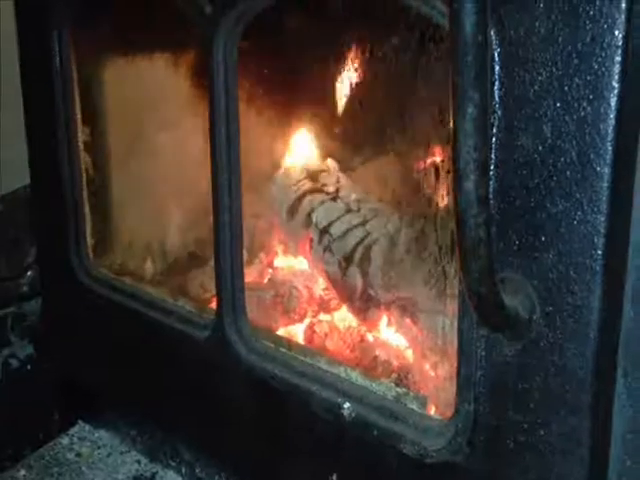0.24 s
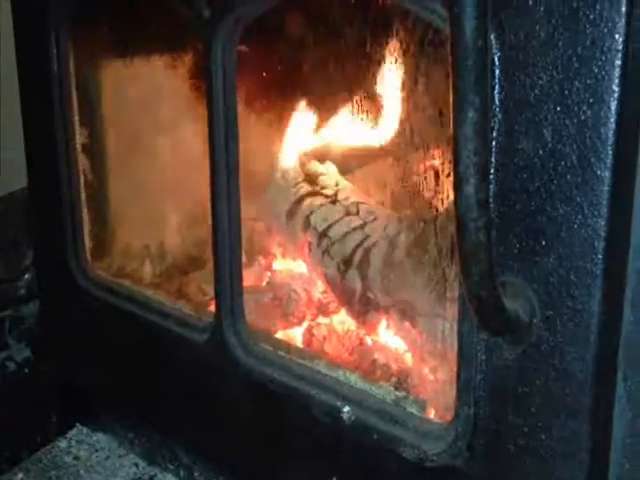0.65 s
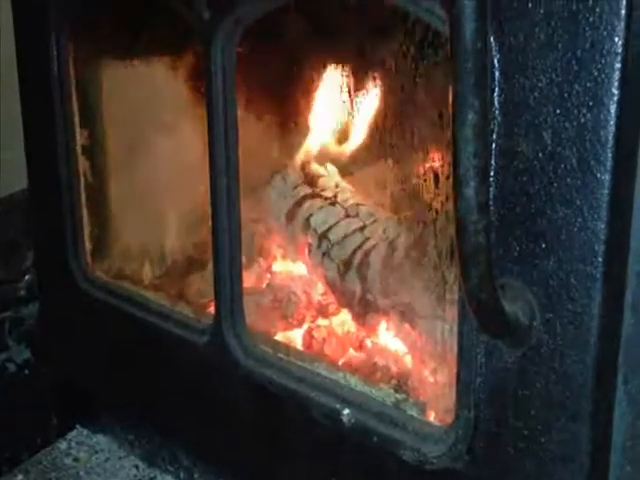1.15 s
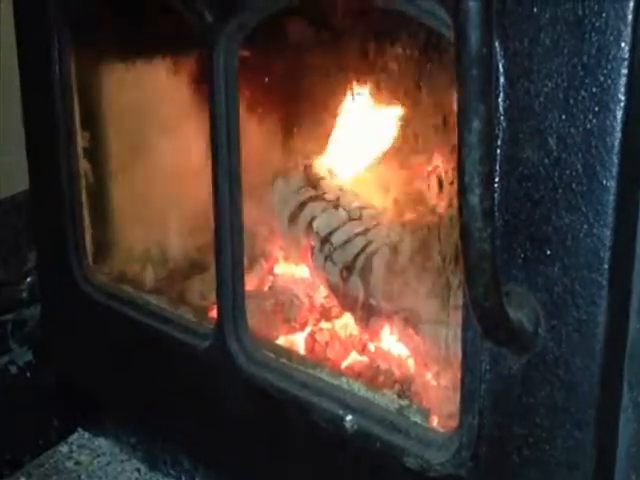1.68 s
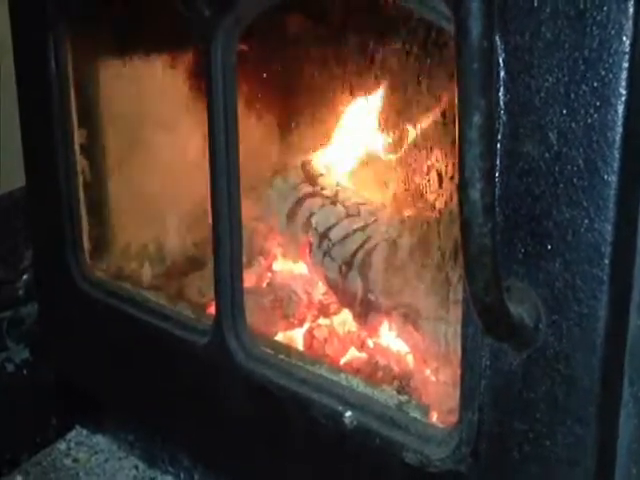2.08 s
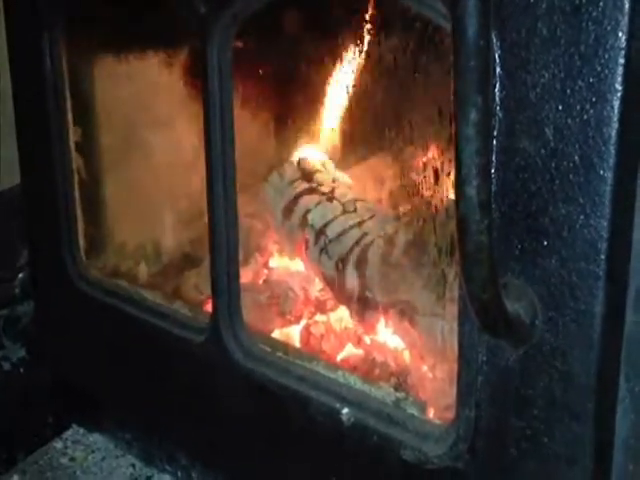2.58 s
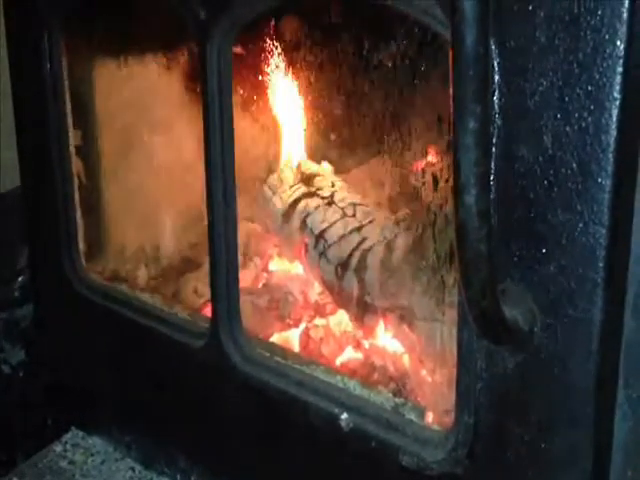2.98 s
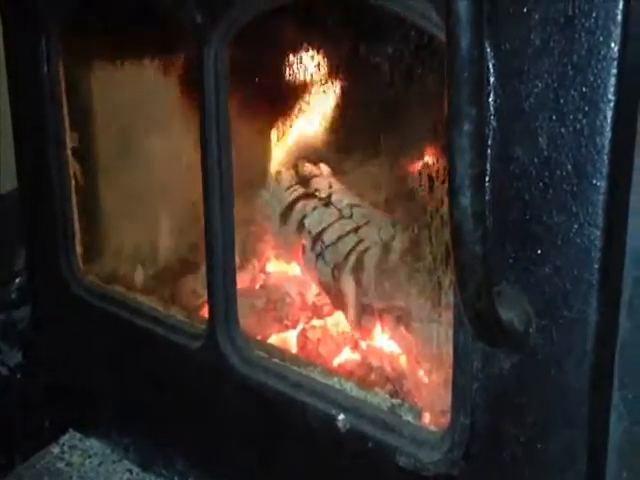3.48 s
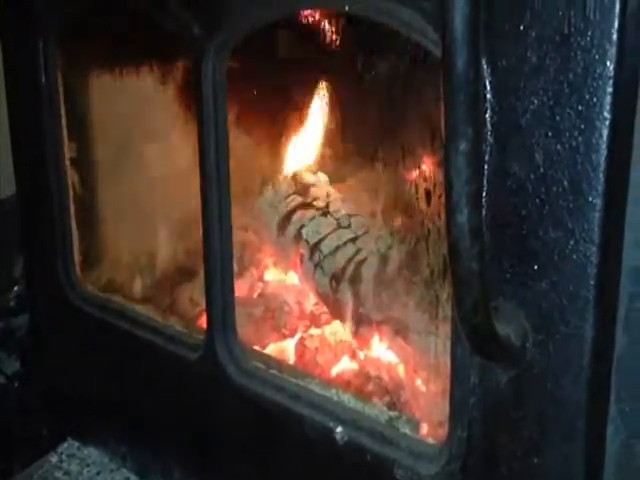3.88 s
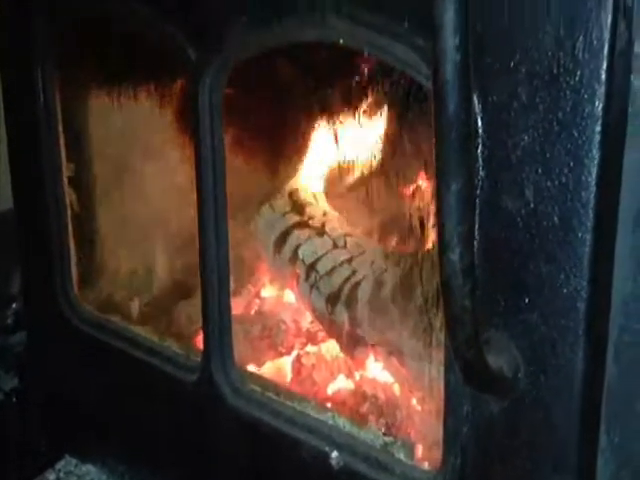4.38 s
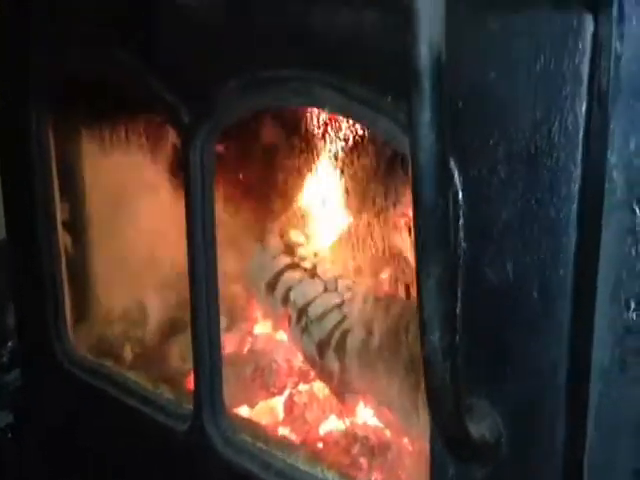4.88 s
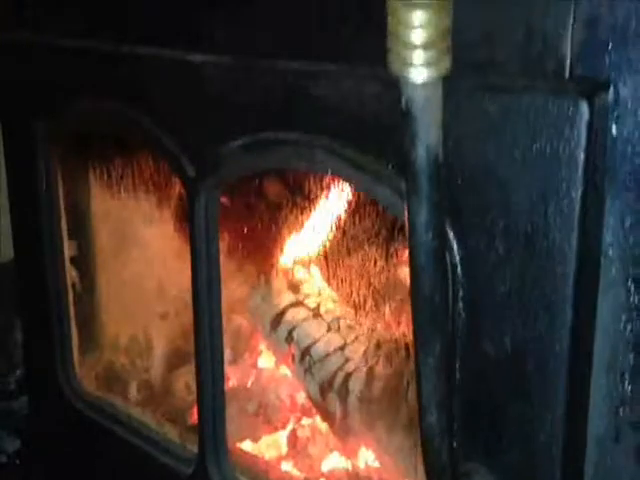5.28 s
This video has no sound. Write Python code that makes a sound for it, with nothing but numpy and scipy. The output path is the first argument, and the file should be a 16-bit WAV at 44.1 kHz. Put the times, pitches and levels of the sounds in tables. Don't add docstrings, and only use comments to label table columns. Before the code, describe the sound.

The first 0.15 s is silent, then quiet room air and a steady low hum near 120 Hz appear at once. From 0.2 s a small heat engine ticks on an iron stove: a crank knock every 0.47 s or so, with a rod click between, from about 0.5 s, making roughly four even ticks a second until the end near 5.5 s. Each tick is a tight burst of hard metal bounces lasting some 20-30 ms, crisp and rattly above 6 kHz, with a short dull plate and frame ring and a small room tail. Knocks have a stronger frame ring; clicks are slightly lighter. A faint rising squeak around 2.6 kHz trails the knocks, with an almost hidden tap afterwards. Throughout, soft low-weighted air noise and flue tones near 410 and 460 Hz continue, while a weak whistle near 560 Hz drifts in and out, longest around 4-5 s.

```python
import sys
import numpy as np
from scipy import signal
from scipy.fft import rfft, irfft, next_fast_len
from scipy.io import wavfile
from scipy.ndimage import uniform_filter1d

SR = 44100
rng = np.random.default_rng(int(sys.argv[2]) if len(sys.argv) > 2 else 0)


def field_ratio(decibels):
    return 10 ** (np.asarray(decibels, dtype=float) / 20)


def bounce(signal):
    frames = np.transpose(np.atleast_2d(signal))
    limited = np.clip(frames, -1, 1)
    pcm = np.round(limited * 32767).astype(np.int16)
    wavfile.write(sys.argv[1], SR, pcm)


N = 244443

# [dB, frame ring]
CRANK_KNOCKS = [(0.196, -50, -42, -41.5), (0.6728, -49, -41.5, -39.5), (1.148, -49.5, -46, -40),
                (1.6212, -53, -43.5, -40.5), (2.0925, -49.5, -44, -38.5), (2.5622, -50, -43.5, -41.5),
                (3.0315, -49.5, -40.5, -39), (3.4994, -50, -40.5, -39), (3.9674, -48.5, -44, -37.5),
                (4.4332, -50, -42, -39.5), (4.8969, -48, -39.5, -39), (5.3374, -48, -40, -38.5)]
# [dB, frame ring]
ROD_CLICKS = [(0.4981, -49, -44.5, -44.5), (0.9762, -52, -41, -46), (1.4502, -51.5, -40.5, -45.5),
              (1.9233, -53.5, -44.5, -44), (2.3913, -50, -47, -43), (2.8642, -50, -41.5, -43),
              (3.3309, -50, -40, -42.5), (3.7983, -53, -39.5, -41), (4.2647, -51, -42, -44),
              (4.7294, -48.5, -42.5, -41), (5.1926, -48.5, -36, -42)]
# first_db [dB], second_db [dB]
PIN_SLIPS = [(-52, -72), (-61, -66), (-50, -64), (-58, -69), (-55, -64), (-58, -73), (-58, -71), (-62, -67),
             (-51, -57), (-52, -57), (-59, -56), (-53, -48)]
# delay_s [s], treble_db [dB], low_db [dB]
KNOCK_CONTACTS = [
    (-.004, -7, -22),
    (0, 0, 0),
    (.0012, -4, -3),
    (.0045, -2, -10),
    (.0095, -1, -2),
    (.0165, -5, -8),
]
# delay_s [s], treble_db [dB], low_db [dB]
CLICK_CONTACTS = [
    (0, 0, 0),
    (.0015, -6, -5),
    (.006, -6, -10),
    (.0105, -2, -3),
    (.015, -3, -7),
    (.026, -9, -8),
]
# pitch_hz [Hz], level_db [dB], t60_s [s]
STOVE_PLATE = [(560, -8, .02), (625, 0, .045), (670, -4, .025), (750, -4, .02), (845, -5, .025),
               (1000, -9, .015)]
# pitch_hz [Hz], level_db [dB], t60_s [s]
KNOCK_FRAME = [(1227, -4, .015), (1480, -7, .012), (1722, -1, .02), (1870, -4, .02), (2100, -6, .015),
               (2540, 1, .02), (2850, -9, .015), (3423, -18, .015), (4435, -24, .03)]
# pitch_hz [Hz], level_db [dB], t60_s [s]
CLICK_FRAME = [(1200, -7, .015), (1722, -1, .02), (2110, -6, .015), (2648, 0, .025), (2900, -4, .015),
               (3251, -8, .012), (3552, -14, .03), (3940, -18, .015)]
# pitch_hz [Hz], level_db [dB], t60_s [s]
CRANK_THIN_PARTS = [(5800, -8, .01), (6158, -6, .012), (6503, -5, .012), (7428, -9, .012), (8333, -7, .012),
                    (9065, -7, .035), (9280, -10, .03), (9689, -10, .03), (10465, -9, .012),
                    (10938, -5, .015), (11304, -1, .02), (11670, -3, .015), (12553, -6, .012),
                    (12812, -4, .03), (13221, -6, .012), (13544, -6, .015), (14104, -4, .025)]
# pitch_hz [Hz], level_db [dB], t60_s [s]
ROD_THIN_PARTS = [(5900, -8, .01), (6223, -4, .012), (6610, -3, .012), (7428, -5, .012), (7795, -2, .014),
                  (8074, -3, .012), (8527, -7, .012), (9453, -7, .012), (10292, -8, .012),
                  (10852, -5, .012), (11326, -4, .012), (11606, -5, .012), (12726, -3, .012),
                  (13221, -3, .012), (13652, -4, .012), (14039, -2, .012), (14400, 0, .015)]
# start_s [s], length_s [s], level_db [dB]
WHISTLE_SPELLS = [(0.174, 0.47, -60), (0.955, .15, -59), (1.44, 0.11, -55), (1.67, 0.34, -56),
                  (2.305, 0.056, -54), (2.683, .35, -59), (3.182, 0.23, -63), (3.806, 0.071, -54),
                  (3.96, 0.99, -60), (4.18, 0.077, -54), (5.17, 0.33, -61)]
# pitch_hz [Hz], width_hz [Hz], level_db [dB rms]
DRAUGHT = [
    (412.2, 7.8, -61.5),
    (462.7, 12, -61),
    (850, 50, -65),
]
# pitch_hz [Hz], level_db [dB rms]
HUM = [
    (59.9, -66),
    (119.9, -48.5),
    (221.3, -66),
]
# pitch_hz [Hz], density_db [dB per Hz]
AIR_COLOUR = [(25, -18), (50, -5), (88, 0.5), (150, -3), (300, -6), (450, -2), (1000, -8), (1800, -11.5),
              (2900, -18), (3800, -25.5), (6200, -28), (7500, -33.5), (14500, -33.5), (16000, -40)]
# time_s [s], level_db [dB]
AIR_LEVEL = [(0.4, -48.5), (.9, -47.5), (1.6, -49), (2.5, -50), (3.3, -47.5), (4.5, -48.5), (5.1, -47.5),
             (5.4, -48)]

LEAD_S = .01
TICK_SAMPLES = 8000


def engine():
    slack_delay_s, slack_db = .195, -68
    track = np.zeros(N)
    for (s, *levels_db), slips_db in zip(CRANK_KNOCKS, PIN_SLIPS):
        knock = tick(KNOCK_CONTACTS, KNOCK_FRAME, CRANK_THIN_PARTS, levels_db, rattle_db=-6.5, rattle_s=.021)
        add(track, s, room(knock) + squeak(slips_db))
        slack = tick([(0, 0, 0)], CLICK_FRAME, ROD_THIN_PARTS, [slack_db] * 3, rattle_db=-9, rattle_s=.005)
        add(track, s + slack_delay_s, slack)
    for s, *levels_db in ROD_CLICKS:
        click = tick(CLICK_CONTACTS, CLICK_FRAME, ROD_THIN_PARTS, levels_db, rattle_db=-8, rattle_s=.017)
        add(track, s, room(click))
    return track


def tick(contacts, frame, thin_parts, levels_db, rattle_db, rattle_s):
    treble_db, thud_db, frame_db = levels_db
    high, low = blows(contacts, rattle_db, rattle_s)
    crack_band = signal.butter(5, [5700, 14900], "band", fs=SR, output="sos")
    snap_band = signal.butter(3, [550, 3000], "band", fs=SR, output="sos")
    crack = signal.sosfilt(crack_band, high - .27 * np.roll(high, 1))
    snap = signal.sosfilt(snap_band, low)
    damped_parts = [(hz, db, .85 * t60) for hz, db, t60 in thin_parts]
    sound = body(high, damped_parts, treble_db - 1.5, scatter_db=1.5)
    sound += field_ratio(treble_db + 5) * crack + field_ratio(frame_db + 19.5) * snap
    sound += body(low, STOVE_PLATE, thud_db, scatter_db=.8)
    sound += body(low, frame, frame_db - 1.5, scatter_db=1.2)
    return sound


def blows(contacts, rattle_db, rattle_s):
    scrape_s, jitter_s, size_scatter_db = .0015, .0003, 1.5
    t = tick_time()
    rattle = np.where(t > 0, np.exp(-(np.abs(t) / rattle_s) ** 4), 0) * field_ratio(rattle_db)
    high = rattle * rng.standard_normal(len(t))
    low = rattle * field_ratio(-19.5) * rng.standard_normal(len(t))
    grit = rng.standard_normal(len(t))
    for delay, high_db, low_db in contacts:
        late, size = rng.standard_normal(2)
        start = delay + jitter_s * late * (delay != 0)
        scrape = np.where(t >= start, np.exp(-np.abs(t - start) / scrape_s), 0)
        high += field_ratio(high_db + size_scatter_db * size) * grit * scrape
        low[int((LEAD_S + start) * SR)] += field_ratio(low_db + size_scatter_db * size)
    return high, low


def body(push, modes, peak_db, scatter_db):
    rings = []
    for hz, db, t60 in modes:
        louder, sharper = rng.standard_normal(2)
        rings.append(field_ratio(db + scatter_db * louder) * ring(push, hz * (1 + .0021 * sharper), t60))
    sound = sum(rings[::2]) - sum(rings[1::2])
    loudest = np.sqrt(uniform_filter1d(sound ** 2, size=180).max())
    return field_ratio(peak_db) * sound / loudest


def squeak(slips_db):
    slips = ((.006, .055), (.064, .04))
    fade_db_per_s, edge_s = -70, .006
    t = tick_time()
    pitch_hz = (2612 + 10000 * t ** 2) * (1 + .0013 * walk(67, TICK_SAMPLES))
    level = 0
    for db, (start, hold) in zip(slips_db, slips):
        level = level + field_ratio(db + fade_db_per_s * (t - start)) * swell(t, start, hold, edge_s)
    return level * field_ratio(.8 * walk(90, TICK_SAMPLES)) * sine(pitch_hz)


def room(x):
    t60_s, tail_db, gap_s = .2, -5, .003
    t = np.arange(len(x)) / SR
    tail = rng.standard_normal(len(t)) * np.exp(-np.log(1000) * t / t60_s) * (t > gap_s)
    tail /= np.sqrt(np.sum(tail ** 2))
    return x + field_ratio(tail_db) * signal.fftconvolve(x, tail)[:len(x)]


def whistle():
    edge_s, rest_db = .043, -68.5
    t = np.arange(N) / SR
    spells = sum(field_ratio(db) * swell(t, s, length_s, edge_s) for s, length_s, db in WHISTLE_SPELLS)
    note = field_ratio(2 * walk(21.88)) * sine(563 + 1.6 * walk(12))
    return (field_ratio(rest_db) + spells) * note


def draught():
    return sum(field_ratio(db) * narrow(hz, width_hz) for hz, width_hz, db in DRAUGHT)


def hum():
    return sum(field_ratio(db + .5 * walk(4.9)) * sine(np.full(N, hz)) for hz, db in HUM)


def air():
    size = next_fast_len(N)
    hz = np.maximum(np.arange(size // 2 + 1) * SR / size, 1)
    colour_hz, colour_db = np.transpose(AIR_COLOUR)
    colour = rfft(rng.standard_normal(size)) * field_ratio(np.interp(np.log(hz), np.log(colour_hz), colour_db))
    octave = np.log2(hz / 30)
    noise = np.zeros(N)
    for k in range(11):
        band = irfft(colour * np.clip(1 - np.abs(octave - k), 0, 1), size)[:N]
        noise += band * field_ratio(.65 * walk(9))
    middle = irfft(colour * (hz > 200) * (hz < 4000), size)
    level_db = curve(AIR_LEVEL) + .2 * walk(1.5)
    return field_ratio(level_db) * noise / np.sqrt(np.mean(middle ** 2))


def ring(x, hz, t60):
    decay = np.log(1000) / (max(t60, 1e-3) * SR)
    pole = np.exp(2j * np.pi * min(hz, .45 * SR) / SR - decay)
    return signal.lfilter([1], [1, -pole], x).imag


def narrow(hz, width_hz):
    x = ring(rng.standard_normal(N), hz, np.log(1000) / (np.pi * width_hz))
    return x / np.sqrt(np.mean(x ** 2))


def sine(pitch_hz):
    return np.sqrt(2) * np.sin(2 * np.pi * np.cumsum(pitch_hz) / SR)


def walk(rate, size=N):
    hold = int(SR / rate)
    steps = np.repeat(rng.standard_normal(size // hold + 1), hold)
    return 1.9 * uniform_filter1d(uniform_filter1d(steps, hold), hold)[:size]


def swell(t, start, hold, edge):
    return np.clip(np.minimum(t - start, start + hold - t) / edge + .5, 0, 1)


def curve(rows):
    return np.interp(np.arange(N) / SR, *np.transpose(rows))


def tick_time():
    return np.arange(TICK_SAMPLES) / SR - LEAD_S


def add(track, s, sound):
    i = int((s - LEAD_S) * SR)
    track[i:i + len(sound)] += sound[:len(track) - i]


def scene():
    return (engine() + whistle() + draught() + hum() + air())[None]


def top_cut(x):
    return signal.sosfilt(signal.butter(12, 15920, fs=SR, output="sos"), x)


def record(dry):
    top_hz, open_s = 15240, .152
    soft = signal.sosfilt(signal.ellip(6, 1, 32, top_hz, fs=SR, output="sos"), dry)
    mix = soft * (np.arange(N) >= open_s * SR)
    return top_cut(mix)


dry = scene()
out = record(dry)
bounce(out)
```